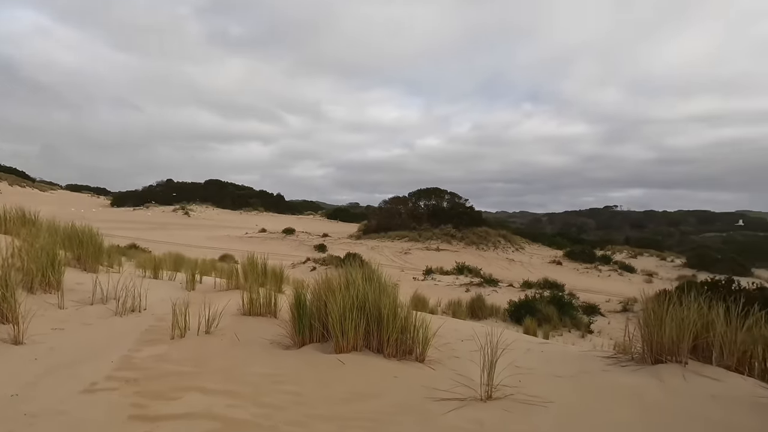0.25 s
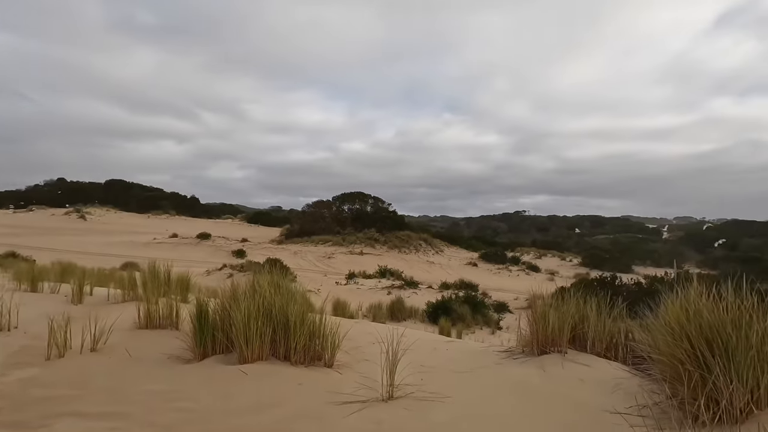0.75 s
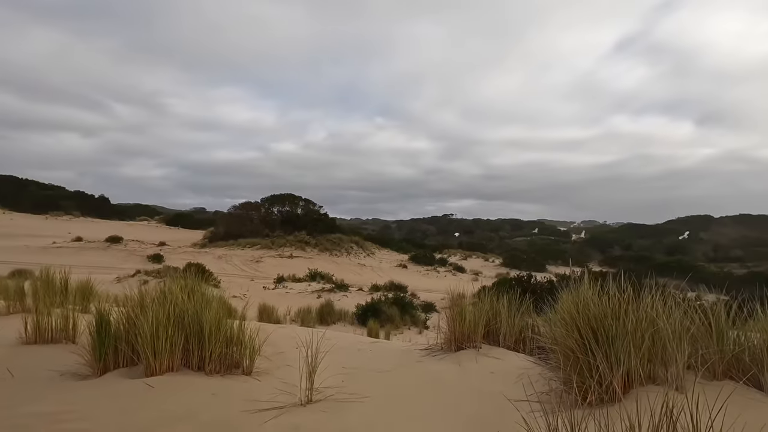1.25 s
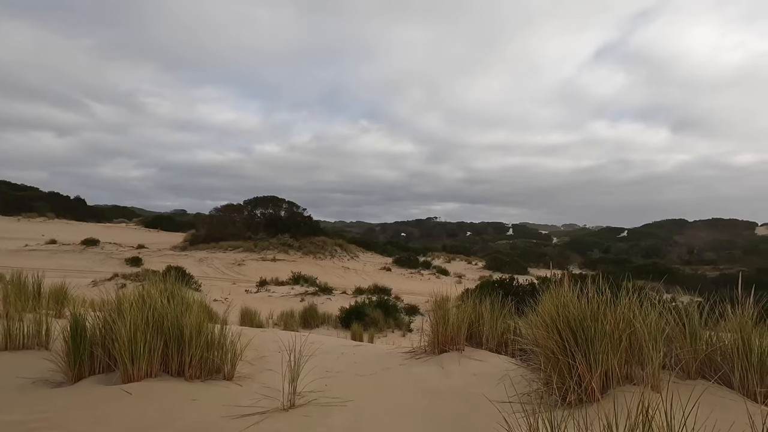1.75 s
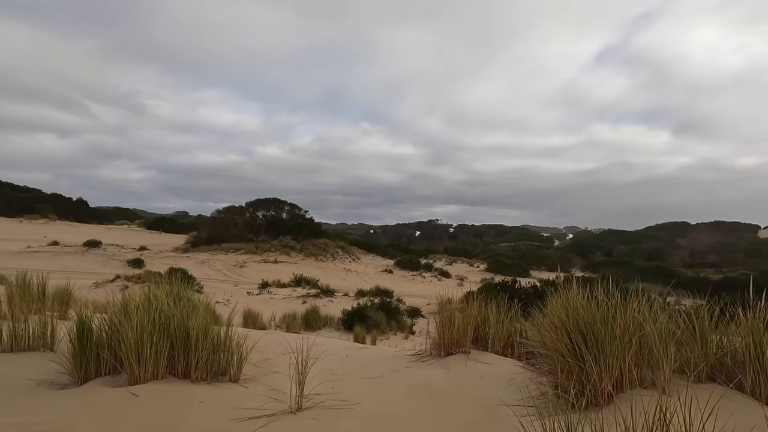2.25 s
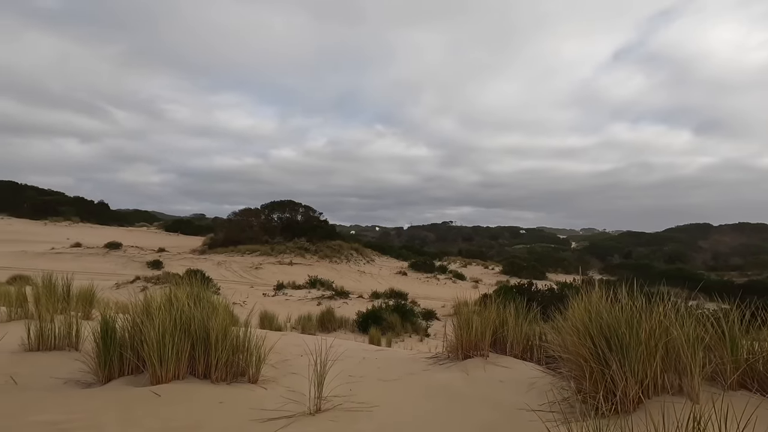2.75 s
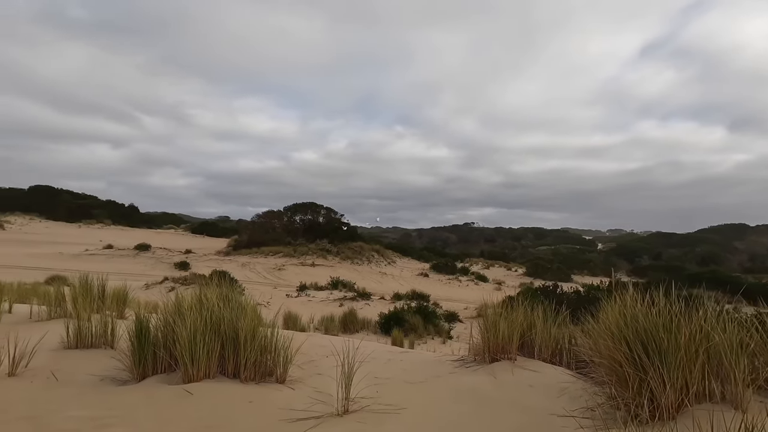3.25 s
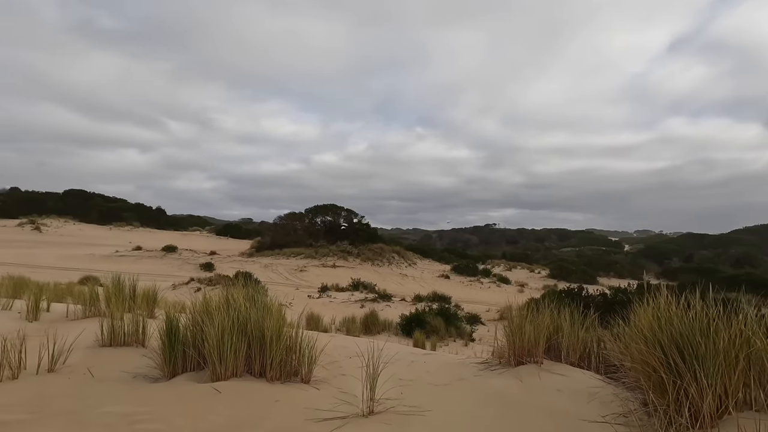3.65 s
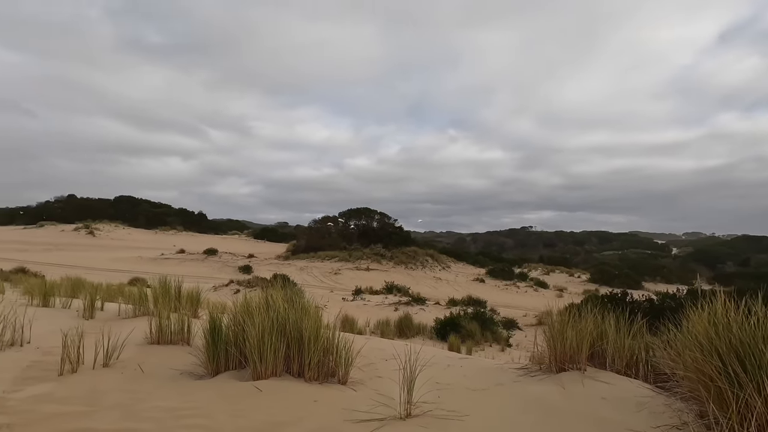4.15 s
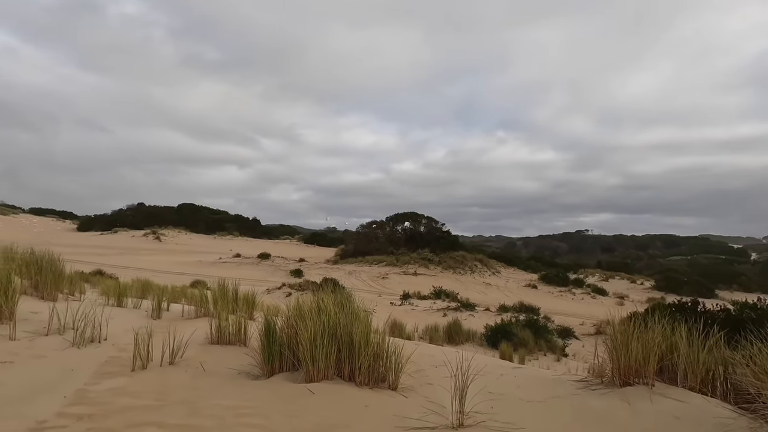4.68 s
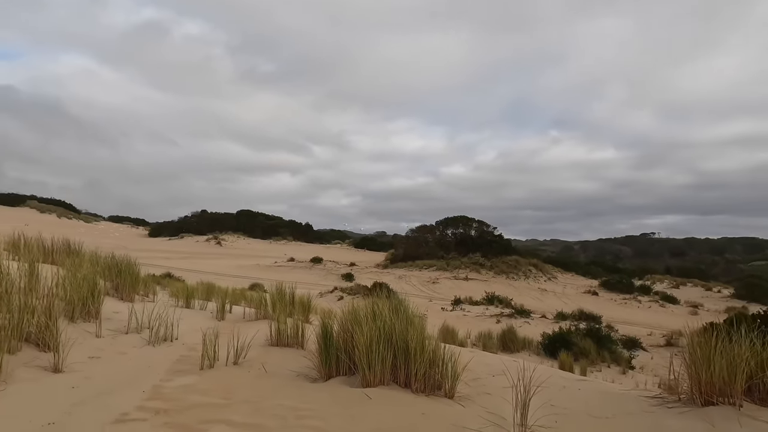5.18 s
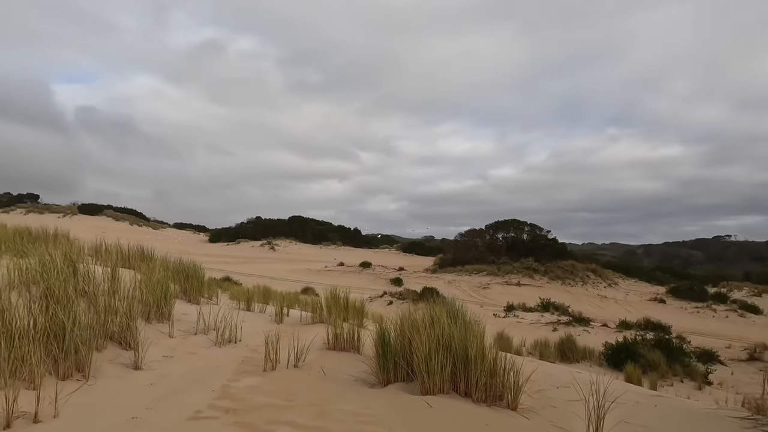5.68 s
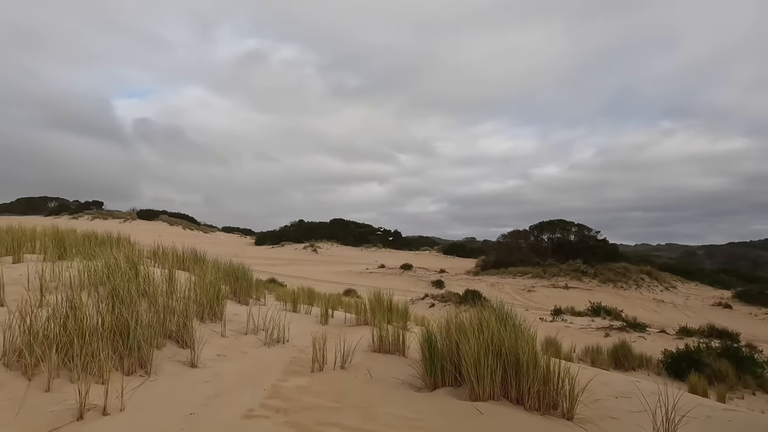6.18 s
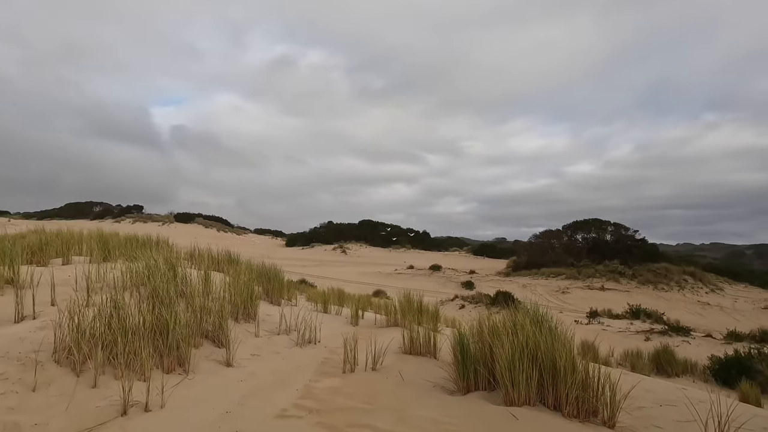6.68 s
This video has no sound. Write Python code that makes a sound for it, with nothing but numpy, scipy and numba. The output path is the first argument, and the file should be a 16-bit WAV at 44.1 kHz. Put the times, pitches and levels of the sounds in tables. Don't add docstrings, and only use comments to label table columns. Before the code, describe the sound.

Harsh, raspy parrot-like screeches ring over open dunes: left first, loudest straight ahead, later a cluster on the right. Between them distant cockatoos squawk softly, smeared by scrub and a light echo from the slopes. Two tiny dry beak clicks come from far off just before the loudest calls. Under everything, a small stereo camera picks up uneven wind thumps, a dull surf rumble and rustling grass.

```python
import sys
import numpy as np
from scipy import signal
from scipy.fft import rfft, irfft
from scipy.io import wavfile
from scipy.ndimage import uniform_filter1d
from numba import njit

SR = 44100
rng = np.random.default_rng(int(sys.argv[2]) if len(sys.argv) > 2 else 0)


def transcribe(signal):
    frames = np.atleast_2d(signal).T
    limited = np.clip(frames, -1, 1)
    pcm = np.round(limited * 32767).astype(np.int16)
    wavfile.write(sys.argv[1], SR, pcm)


def rack_gain(trim_db):
    fader = np.asarray(trim_db, float)
    return 10 ** (fader / 20)


N = 305552
T = np.arange(N) / SR

# start_s, end_s, full_level_db, swell_s, sag_db (soon after the swell)
NEAR_CALLS = [
    (-0.3, 0.034, -49, .1, -2),
    (0.309, 0.907, -47.5, 0.15, -3.5),
    (1.316, 1.79, -32, 0.0983, -3.5),
    (2.065, 2.567, -34, 0.22, -1),
    (4.567, 5.124, -39, .17, -3),
    (4.891, 5.42, -37.5, .13, -2.5),
    (5.423, 5.977, -39, 0.097, -2),
    (6.294, 6.769, -41, 0.095, -0.5),
]
# place, windpipe_hz, clear_stretch_s, yelp_s, sand_echo_ms, echo_share
NEAR_PATHS = [("left", 920, .01, .04, 2.3, .3), ("left", 895, .01, .036, 2.4, .65),
              ("ahead", 1015, .005, .022, .45, .05), ("ahead", 950, .04, .046, .45, .05),
              ("right", 965, .01, .04, 2.1, .2), ("right pair", 930, .005, .06, 2.1, .08),
              ("right", 928, .03, .035, 2.15, .15), ("right last", 935, .012, .039, 1.07, .15)]
# start_s, end_s, full_level_db, swell_s, sag_db (by the end)
FAR_CALLS = [
    (1.0, 1.304, -69, 0.088, -9.5),
    (1.742, 2.099, -58, 0.096, 4.5),
    (2.482, 2.753, -71, .08, -5),
    (2.775, 3.335, -55.5, 0.15, 1.5),
    (3.281, 3.568, -64, .06, -7),
    (3.59, 4.152, -56, .19, 2.5),
    (4.299, 4.484, -63, .16, -7),
]
# place, windpipe_hz
FAR_BIRDS = [("far wings", 900), ("far", 870), ("far bright", 900), ("far high", 880), ("far wings", 900),
             ("far", 900), ("far", 900)]
# clear_stretch_s, yelp_s, sand_echo_ms, echo_share
FAR_PATH = (.01, .024, 1.32, 0.12)
BUZZ_LOCKS = [4.73, 4.83, 5.54, 5.61, 5.655, 5.875, 6.68]
COLOUR_FRONT = {"left": [(260, -19.5), (450, -16), (672, -21.5), (974, -10.5), (1500, -8.5), (1830, -6),
                (2050, -6.5), (2650, -8.5), (2890, -12.5), (3580, -15.5), (13700, -88.5)],
                "ahead": [(260, -67.5), (450, -24), (681, -27.5), (947, -10.5), (1260, -10), (1580, -16),
                (1800, -8), (2140, -5), (2400, -6.5), (3950, -6), (6250, -22), (7630, -28), (13700, -62)]}
COLOUR_RIGHT = {"right": [(260, -55), (450, -28), (721, -22.5), (881, -13), (1330, -12.5), (1850, -9),
                (2230, -4), (2400, -15.5), (3010, -5.5), (5570, -17.5), (7530, -29.5), (8930, -48.5),
                (13700, -57)], "right last": [(290, -68), (500, -14.5), (758, -17.5), (920, -5),
                (1280, -12.5), (1810, -8), (2390, -16), (2790, -9.5), (7460, -24.5), (8100, -42),
                (8570, -71), (9840, -40.5), (13700, -68)], "right pair": [(240, -56), (400, -19.5),
                (760, -7.5), (902, -4.5), (1400, -7), (2010, -6), (2860, -7), (5650, -15.5), (7480, -23.5),
                (8670, -49), (9340, -43), (13700, -55.5)]}
COLOUR_FAR = {"far bright": [(500, -22), (1400, -13), (2200, 0), (4000, -9), (8000, -12), (13700, -32)],
              "far": [(320, -47), (550, -20), (652, -8.5), (831, -5.5), (1150, -4), (1870, 3.5), (2900, -3),
              (3400, -3.5), (5260, -18.5), (10000, -69), (13000, -114), (22000, -120)],
              "far high": [(290, -57), (500, -11), (948, -13), (1130, -12), (1400, -8), (2340, -1),
              (3040, -6.5), (3580, -3.5), (4260, -18), (10000, -58), (13000, -99), (22000, -120)],
              "far wings": [(290, -42), (500, 9.5), (847, -12), (895, -11), (1280, 4), (1470, -19),
              (2110, -12), (2990, -16), (5270, -13), (13700, -37)]}
BEAK_BALANCE = {"left": (-7, -5, -6), "ahead": (-9, -3.5, -7), "right": (-8.5, 0.5, -11),
                "right pair": (-7, 1.5, -14), "right last": (-5.5, 3, -16), "far": (-8.5, -5.5, -18),
                "far high": (-9, -10.5, -14), "far wings": (1.5, -6.5, -14), "far bright": (-25, -15, -5)}
PORTS = {"left": [(500, -0.5, 0), (1000, 5.5, .1), (2180, 5.5, -0.5), (3040, 5, -.1), (4000, 2, 0),
         (9000, 6, 0)], "ahead": [(500, 1, -0.69), (1500, -1, -1), (2200, 3.5, -0.75), (2910, -3.5, -0.7),
         (3240, -1.5, 1), (5000, 2, 1), (6000, 1.5, -0.26), (9000, 2.5, -.5)], "right": [(500, -0.5, -0.4),
         (1500, -0.5, -0.49), (2200, -3, -1.4), (2600, -3, -0.056), (3380, 2.5, -0.45), (4000, 2, -1.2),
         (5000, -3, -0.87), (9000, 0.5, -1.2)], "far": [(500, 1.5, 1), (1000, 3, 0.13), (2200, 6, -.4),
         (3000, 1.5, -.1), (9000, 6, 0)]}
# level_db, chest_db, open_beak_db, rasp_db
ONSET, RISING, YELP, STOP = (-24.5, 3, -10, -11.5), (-4, 1, -5, -6), (4.5, -7, -6, -5.5), (-9.5, -1.5, -4.5, -7)
GLIDING = (-15, -6, -16, -18), (-0.5, -8, -13.5, -10)
# time_s, peak_db, pitch_hz
CLICKS = [(1.2244, -55, 1630), (1.2833, -52, 2100)]
# time_s, buffeting_db
GUSTS = [(0.0, -52.5), (0.62, -43.5), (0.65, -44), (0.79, -35.5), (0.85, -46), (1.79, -53), (3.95, -49.5),
         (4.03, -46), (4.19, -50.5), (4.59, -45), (5.04, -54.5), (5.23, -49), (5.27, -53), (6.31, -42.5),
         (6.89, -51), (6.93, -43)]
# middle_s, half_length_s, over_hiss_db
RUSTLES = [(.68, 0.099, 8.5), (1.197, 0.34, 12.5), (3.288, 0.29, 18), (4.097, 0.12, 8), (4.965, 0.087, 13),
           (5.8, 0.14, 4.5), (6.43, 0.49, 13)]
# pitch_hz, level_db_per_hz
AIR_COLOUR = [(12, -44.5), (20, 10), (66, -6), (107, -7), (293, -18), (428, -29), (531, -34), (625, -44.5),
              (1260, -47), (1530, -46.5), (1750, -57.5), (1900, -40), (13000, -79)]


def screech(row, path, scatter_s=0.034):
    place, tone_hz, clear_s, yelp_s, echo_ms, echo, scatter = path
    side = place.split()[0]
    sinks = side in ("left", "far")
    s, *controls = effort(*row, tone_hz, clear_s, yelp_s, place, sinks)
    first = max(int(s[0] * SR), 0)
    t = T[first:int(s[-1] * SR)]
    n = len(t)
    hz, db, chest_db, beak_db, rasp_db, rough, weak = (np.interp(t, s, c) for c in controls)
    waver, waver_per_s, climb = .035, 18, .07
    hz = hz * (1 + waver * walk(waver_per_s)[:n] * rough + sinks * climb * np.linspace(-.5, .5, n))
    lock_s, lock_calms, lock_weak = .016, .45, .35
    lock = sum(np.exp(-((t - at) / lock_s) ** 2) for at in BUZZ_LOCKS)
    rough, weak = rough * (1 - lock_calms * lock), weak + lock_weak * lock

    voice = 0
    for detune in (1, 1.09) if scatter > .5 else (1,):
        snaps = syrinx(detune * hz, rough, weak)
        voice = voice + windpipe(snaps, SR / (detune * hz) - 1, back=0.15, dull=0.52)
    voice = beak(voice, place)
    voice = sand_echo(voice, t, echo_ms, echo, sinks)
    blur = scrub(voice, scatter_s)
    heard = np.sqrt(1 - scatter) * unit(voice) + np.sqrt(scatter) * blur[0]
    pair = ports(heard, blur[1], side, scatter)

    above_chest, above_pipe, rasp = (step(n, edge_hz, steep=7) for edge_hz in (1450, 2550, 4500))
    bands = [(1 - above_chest, db + chest_db), (above_chest - above_pipe, db),
             (above_pipe - rasp, db + beak_db), (rasp, db + rasp_db)]
    out = np.zeros((2, N))
    for band, gain_db in bands:
        part = irfft(pair * band, n)
        out[:, first:first + n] += part / np.std(part.mean(0)) * rack_gain(gain_db)
    fade_s = 0.0057
    return out * np.clip(np.minimum(T - s[0], s[-1] - T) / fade_s, 0, 1)


def effort(start, end, db, swell_s, sag_db, hz, clear_s, yelp_s, place, sinks):
    attack_s, sag_s, flip_s, stop_s = .04, .14, .008, .018
    yelp = end - yelp_s
    clear = yelp - clear_s
    s = np.maximum.accumulate([start, start + attack_s, start + swell_s, clear - flip_s, clear, yelp,
                               yelp + flip_s, end - stop_s, end])
    held = (0, 0, 0, 0)
    opening = GLIDING if sinks else (ONSET, RISING)
    stages = np.transpose([*opening, held, held, held, held, YELP, YELP, STOP])
    levels = stages + np.array([db, *BEAK_BALANCE[place]])[:, None]
    flat, yelp_hz, droop = .96, 1165, .96
    tone = np.array([flat * hz] * 2 + [hz] * 4 + [yelp_hz, droop * yelp_hz, droop ** 4 * yelp_hz])
    sag_end = s[5] if place.startswith("far") else s[2] + sag_s
    sag = np.interp(s, [s[2], sag_end], [0, sag_db])
    push = 151 * (yelp_s - .04) * (s > yelp)
    rough = [.9] * 4 + [.38] * 5
    weak = [0] * 4 + [.2] * 2 + [.85] * 3
    return s, tone, levels[0] + sag + push, *levels[1:], rough, weak


def syrinx(hz, rough, weak, breath=0.39):
    drift, jitter, scatter_db = .13, .12, 8.
    n = len(hz)
    turns = np.cumsum(hz) / SR
    k = np.arange(1, int(turns[-1]))
    rough_k, weak_k = np.interp(k, turns, rough), np.interp(k, turns, weak)
    chance = rng.standard_normal((3, len(k)))
    turn = k + np.cumsum(drift * rough_k ** 2 * chance[0]) + jitter * rough_k * chance[1]
    at = np.interp(turn, turns, np.arange(n))
    push = signal.lfilter([1], [1, .5, .45], chance[2])
    size = rack_gain(scatter_db * rough_k * (np.minimum(push, 1.4) - 1.5))
    size = size * (1 + weak_k * (-1.) ** k)
    near = np.floor(at)[:, None] + np.arange(-7, 9)
    off = near - at[:, None]
    pulses = size[:, None] * np.sinc(off) * np.cos(np.pi * off / 16) ** 2
    snaps = np.bincount(np.clip(near, 0, n - 1).astype(int).ravel(), pulses.ravel(), n)
    snaps = snaps + breath * rough * rng.standard_normal(n) * np.sqrt(hz / SR)
    soft = np.clip(0.7 * weak, 0, 1)
    dulled = signal.sosfilt(signal.butter(4, 2500, fs=SR, output="sos"), snaps)
    return (1 - soft) * snaps + soft * dulled


@njit
def windpipe(x, lag, back, dull):
    y, soft = x.copy(), 0.
    for i in range(100, len(x)):
        k = int(lag[i])
        back_then = y[i - k] + (lag[i] - k) * (y[i - k - 1] - y[i - k])
        soft += (1 - dull) * (back_then - soft)
        y[i] += back * soft
    return y


def beak(voice, place):
    ring_hz, width_hz = 2117, 89
    ring_db = -8 + 5.5 * (place == "ahead")
    ring = signal.lfilter(*signal.iirpeak(ring_hz, ring_hz / width_hz, SR), voice)
    colour = {**COLOUR_FRONT, **COLOUR_RIGHT, **COLOUR_FAR}[place]
    return signal.fftconvolve(voice + rack_gain(ring_db) * ring, causal(colour))[:len(voice)]


def sand_echo(voice, t, echo_ms, share, sinks):
    delay_s = echo_ms * np.linspace(1, 0.855 if sinks else 1, len(t)) / 1000
    return voice + share * np.interp(t - delay_s, t, uniform_filter1d(voice, size=5))


def scrub(voice, t60_s):
    n = len(voice)
    late = rng.standard_normal((2, 4000)) * np.exp(-T[:4000] / t60_s * np.log(1000))
    return unit(signal.fftconvolve(np.tile(voice, 2)[None], late, axes=1)[:, n:2 * n])


def ports(heard, blur, side, scatter):
    n = len(heard)
    lean_db, lead = on_hz(PORTS[side], n)
    ratio = rack_gain(lean_db) * np.exp(1j * np.clip(lead, -1.6, 1.6))
    pair = 2 * np.array([ratio, np.ones_like(ratio)]) / (1 + ratio) * rfft(heard)
    apart = 0.041 + 0.13 * scatter + 0.51 * step(n, 7000, steep=5.4)
    return pair + apart * rfft(blur) * np.array([[1], [-1]])


def dunes(x, db, t60_s, low_hz):
    late = rng.standard_normal((2, SR)) * np.exp(-T[:SR] / t60_s * np.log(1000))
    late = uniform_filter1d(late, size=3, axis=1)
    late = signal.sosfilt(signal.butter(2, low_hz, "high", fs=SR, output="sos"), late)
    late = late / np.sqrt(np.sum(late[0] ** 2))
    stirred = x * unit(walk(300))
    return rack_gain(db) * signal.fftconvolve(stirred, late, axes=1)[:, :N]


def clicks(ring_s=0.004):
    out = np.zeros(N)
    for s, db, hz in CLICKS:
        t = np.maximum(T - s, 0)
        out += rack_gain(db) * np.exp(-t / ring_s) * np.sin(2 * np.pi * hz * t) * (1 + 0.72 * walk(3000))
    return out


def wind():
    gust_db = np.interp(T, *np.transpose(GUSTS))
    over_calm_db = gust_db + 50
    rustle_db = sum(db * np.exp(-((T - s) / half) ** 2) for s, half, db in RUSTLES)
    surf_db = -58 + 0.4 * over_calm_db
    grass_db = -77.5 + 0.57 * over_calm_db + rustle_db
    layers = [(gust_db, 0.1, 85, 0.33, 3.05), (surf_db, 85, 270, 0.19, 2.3),
              (grass_db, 270, 560, 0.43, 2.3), (-68, 560, 15000, 0.57, 2.2)]
    out = 0
    for db, low_hz, high_hz, apart, flicker_db in layers:
        shape = rack_gain(on_hz(AIR_COLOUR, N)) * step(N, low_hz, steep=5.1) * (1 - step(N, high_hz, steep=7.0))
        mid, side = (unit(irfft(rfft(rng.standard_normal(N)) * shape, N)) for _ in range(2))
        lean = rack_gain(np.array([[-1.2], [1.2]]) * (high_hz < 100))
        swelling = rack_gain(db + flicker_db * walk(9))
        out = out + lean * swelling * (mid + apart * side * np.array([[1], [-1]]))
    return out


def unit(x):
    return x / np.sqrt(np.mean(x ** 2))


def on_hz(table, n):
    hz, *values = np.transpose(table)
    at = np.log(np.fft.rfftfreq(n, 1 / SR) + 1)
    return np.squeeze([np.interp(at, np.log(hz + 1), v) for v in values])


def causal(table):
    cepstrum = irfft(on_hz(table, 1024) * np.log(10) / 20)
    cepstrum[1:512] *= 2
    cepstrum[513:] = 0
    return irfft(np.exp(rfft(cepstrum)))


def step(n, hz, steep):
    ratio = (np.fft.rfftfreq(n, 1 / SR) / hz) ** steep
    return ratio / (1 + ratio)


def walk(rate):
    k = int(SR / rate)
    held = np.repeat(rng.standard_normal(N // k + 1), k)
    return uniform_filter1d(uniform_filter1d(held, k), k)[:N]


def scene():
    near_scatter, far_scatter = 0.14, .56
    near = sum(screech(row, (*path, near_scatter)) for row, path in zip(NEAR_CALLS, NEAR_PATHS))
    flock = sum(screech(row, (*bird, *FAR_PATH, far_scatter), scatter_s=0.2)
                for row, bird in zip(FAR_CALLS, FAR_BIRDS))
    near_answer = dunes(near, db=-22, t60_s=1.58, low_hz=1630)
    far_answer = dunes(flock, db=-7.5, t60_s=.42, low_hz=800)
    return near + flock + near_answer + far_answer + clicks() + wind()


def roll_off(x):
    return signal.sosfilt(signal.butter(12, 13870, fs=SR, output="sos"), x)


def record(dry):
    return roll_off(dry)


dry = scene()
out = record(dry)
transcribe(out)
```